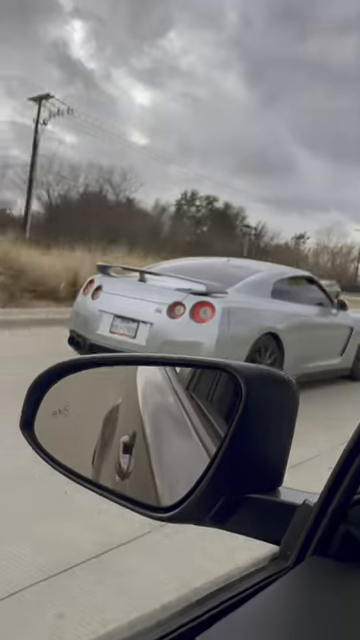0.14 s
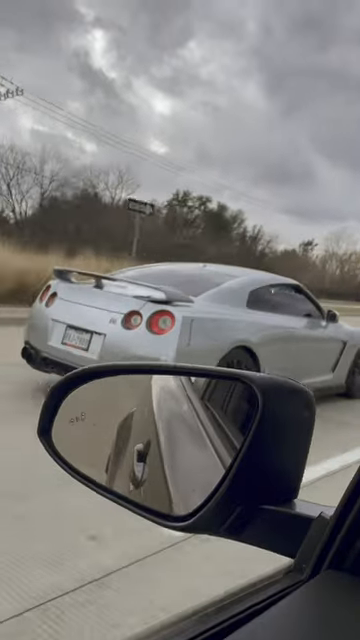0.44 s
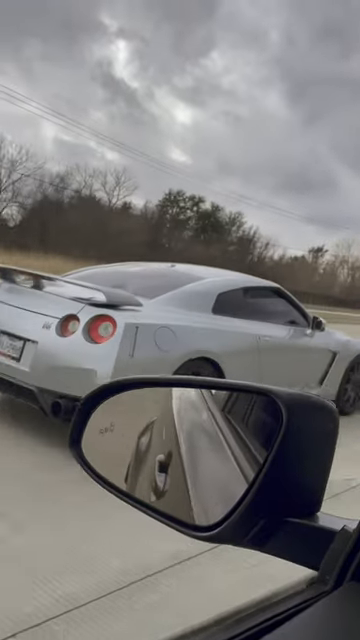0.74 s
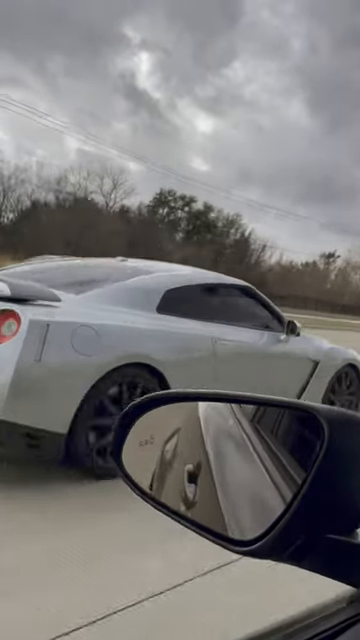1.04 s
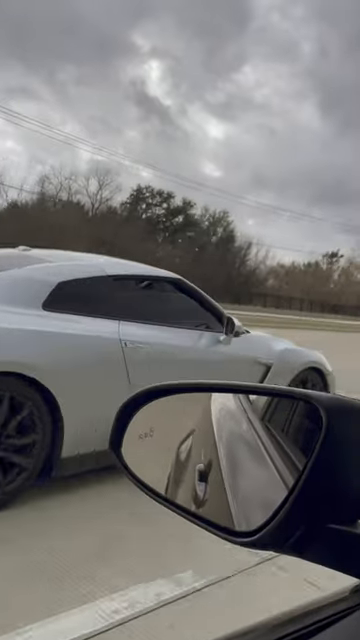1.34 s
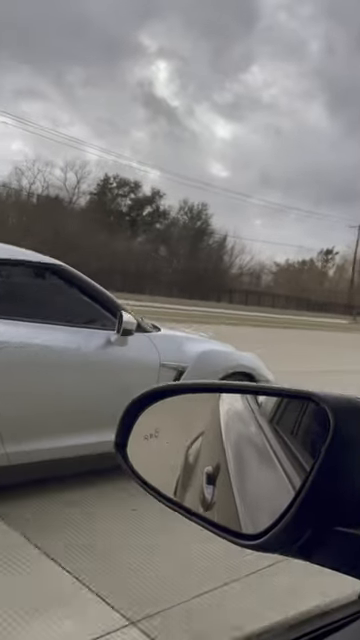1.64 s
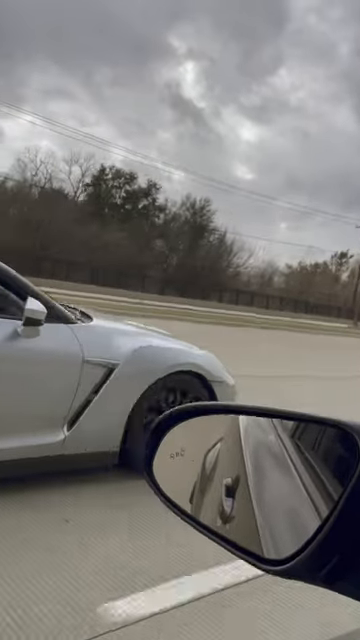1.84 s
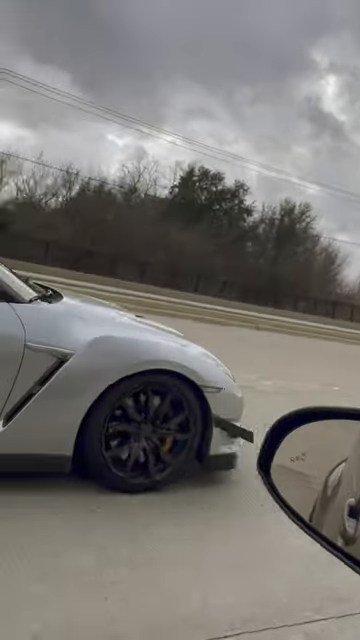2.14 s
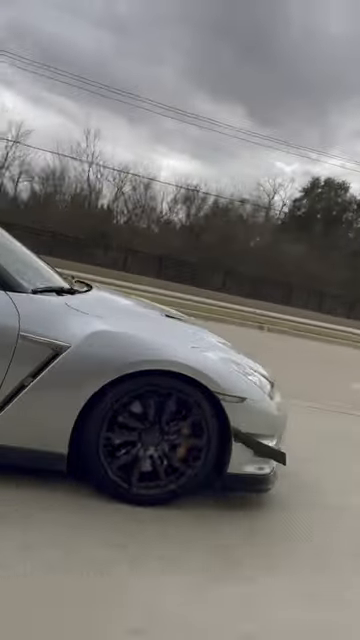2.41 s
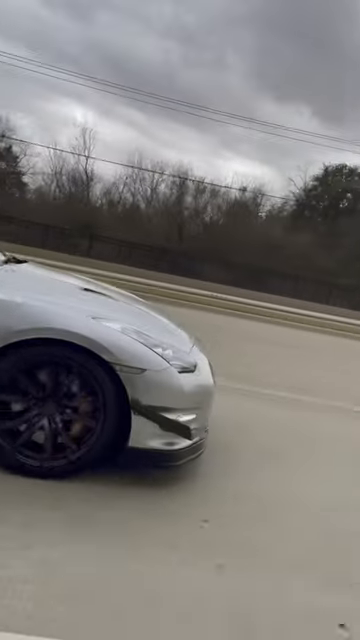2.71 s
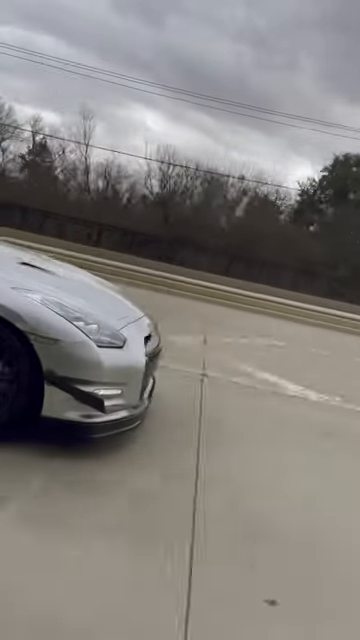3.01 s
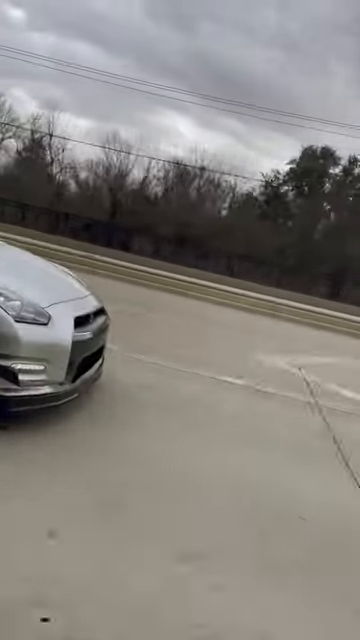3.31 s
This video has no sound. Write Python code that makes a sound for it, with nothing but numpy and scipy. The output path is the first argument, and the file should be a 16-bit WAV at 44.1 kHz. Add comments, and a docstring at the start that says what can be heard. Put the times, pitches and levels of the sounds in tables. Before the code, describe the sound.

Sports car engine heard from a passing car: a buzzing exhaust rasp fades after about a second, leaving a low drone that dips and then climbs, amid road rumble, wind gusts and microphone pops.

```python
"""Overtaking a sports car

A six-cylinder sports car is overtaken on a highway, heard from the open window of the next car.
From behind its exhaust rasps (firing pulses through filters) and throbs (uneven cylinders) as it slows;
alongside, the drone (summed sines) is left and picks up again. Tyre roar and air hiss are coloured noise;
wind is low noise on the microphone, with buffets and a few hard pops."""
import sys
import numpy as np
from scipy import signal
from scipy.fft import rfft, irfft, next_fast_len
from scipy.io import wavfile
from scipy.ndimage import uniform_filter1d

SR = 44100
rng = np.random.default_rng(int(sys.argv[2]) if len(sys.argv) > 2 else 0)


def to_wav(sig):
    """Store sig (one row per channel, or 1-D mono) as 16-bit WAV at the path in sys.argv[1].

    Samples outside -1..1 are clipped; the rate is SR.
    """
    pcm = np.clip(np.atleast_2d(sig), -1, 1) * 32767
    pcm = np.round(pcm).astype(np.int16)
    wavfile.write(sys.argv[1], SR, pcm.T)  # frames by channels


N = 152586
TIME = np.arange(N) / SR

# the six firings of one engine cycle: strength/dB, lead/firing gaps
CYLINDERS = [(2, 0.016), (0.5, .014), (-1.5, 0.028), (0.5, 0.061), (-6.5, 0.052), (-18, 0.015)]
# listening position and weak multiples: t/s, position (0 behind, 1 alongside), weak-multiple trim/dB
VIEW = [(0, 0.0, -1), (.9, 0.077, 1.5), (1.5, 0.48, -1.5), (1.85, 0.64, -2), (2.4, 1, -0.5),
        (3.46, 0.41, -4)]
# exhaust rasp body: t/s, level/dB
RASP_LEVEL = [(0, -38.5), (.131, -34.5), (.86, -36.5), (.99, -43.5), (1.2, -44), (1.62, -62), (1.87, -47),
              (2.2, -51)]

MINOR_FLUTTER_DB, FLUTTER_HZ = 1.5, 13
RASP_PAN_DB, LEFT_LEAD_S = -2, 27e-6  # pan: left minus right


def from_db(db):
    """Decibels to amplitude gain."""
    return 10 ** (np.asarray(db) / 20)


def rms_one(x):
    """Scale to unit rms."""
    return x / np.sqrt(np.mean(x ** 2) + 1e-20)


def in_time(rows):
    """Interpolate each column of a time curve at every sample."""
    t_s, *columns = np.transpose(rows)
    return [np.interp(TIME, t_s, column) for column in columns]


def colour(x, points):
    """Filter by an f/Hz, level/dB curve, zero phase, interpolated over log frequency."""
    f_hz, level_db = np.transpose(points)
    size = next_fast_len(N + SR // 10)
    bins_hz = np.arange(size // 2 + 1) * SR / size
    gain = from_db(np.interp(np.log(bins_hz + 1), np.log(f_hz), level_db))
    return irfft(rfft(x, size) * gain, size)[..., :N]


def drift(rate_hz):
    """Smooth random curve of unit rms: noise through a two-pole low-pass."""
    step = 40  # samples between drawn values
    pole = np.exp(-2 * np.pi * rate_hz * step / SR)
    noise = rng.standard_normal(N // step + 2002)
    slow = signal.lfilter([1], [1, -2 * pole, pole * pole], noise)[2000:]  # drop the settling
    return np.interp(np.arange(N) / step, np.arange(len(slow)), rms_one(slow))


def stereo_noise(points):
    """Coloured noise, alike in both ears in the bass and wide in the treble."""
    # stereo width: f/Hz, side minus mid/dB
    side_curve = [(60, -27.5), (250, -13), (600, -6), (1200, -10.5), (2500, -6.5), (5000, -3.5),
                  (10000, -1)]
    mid, side = colour(rng.standard_normal((2, N)), points)
    return rms_one(mid + colour(side, side_curve) * np.array([[1], [-1]]))


def steadied(x, window_s):
    """Even out the chance swings of a stereo noise: divide by its running rms."""
    power = uniform_filter1d(np.mean(x ** 2, axis=0), int(window_s * SR))
    return x / np.sqrt(power + 1e-9)


def placed(x, pan_db):
    """Pan by level (left minus right) and delay the right ear."""
    left = x * from_db(pan_db / 2)
    right = np.interp(TIME - LEFT_LEAD_S, TIME, x) * from_db(-pan_db / 2)
    return np.array([left, right])


def resonance(x, centre_hz, width_hz):
    """Moving band-pass: shift the centre to 0 Hz, low-pass, shift back."""
    turn = np.exp(2j * np.pi * np.cumsum(centre_hz) / SR)
    low_pass = signal.butter(2, width_hz / 2, fs=SR, output="sos")
    return np.real(signal.sosfilt(low_pass, x / turn) * turn)


def road():
    """Tyre roar: broadband noise, strongest in the bass."""
    # t/s, level/dB
    roar_level = [(0, -30.5), (1.55, -38), (2.7, -34), (3.46, -31)]
    # f/Hz, level/dB
    roar_colour = [(60, 7), (160, 1.5), (500, 3), (1000, -3), (1600, -12), (3200, -20.5), (4300, -27.5),
                   (5500, -26), (6600, -31.5), (7500, -60.5)]
    return from_db(in_time(roar_level)[0]) * stereo_noise(roar_colour)


def air():
    """Air rushing past the window: turbulent hiss."""
    # t/s, level/dB
    hiss_level = [(1.4, -64.5), (2.3, -59), (3.46, -53)]
    # f/Hz, level/dB
    hiss_colour = [(1800, -22), (3200, 9), (5800, 4), (7800, -25), (9000, 3), (12500, -2), (14000, -13.5)]
    return from_db(in_time(hiss_level)[0]) * stereo_noise(hiss_colour)


def buffet(age_s, decay_s):
    """Envelope of one gust: a quick rise and a slower fall."""
    attack_s = 0.0015
    return (1 - np.exp(-age_s / attack_s)) * np.exp(-age_s / decay_s)


def wind():
    """Wind pressure on the microphone: low rumble, with short buffets that reach higher."""
    # t/s, level/dB
    rumble_level = [(0, -28), (.3, -34), (.93, -32), (1.01, -22.5), (1.34, -25.5), (1.58, -31), (1.8, -18),
                    (1.93, -28), (2.0, -20.5), (2.1, -43), (2.34, -25), (2.85, -36), (2.91, -19),
                    (3.2, -20.5), (3.27, -23), (3.46, -19)]
    # f/Hz, level/dB
    rumble_colour = [(20, -31.5), (32, -5), (52, 10), (80, 5.5), (120, -7.5), (200, -13.5), (400, -10.5),
                     (1000, -77.5)]
    # hard buffets: start t/s, decay/s, level before envelope/dB
    gusts = [(1.002, 0.012, -18.5), (1.163, 0.024, -14), (1.589, 0.03, -21), (1.69, 0.19, -21),
             (1.805, 0.047, -17), (2.902, 0.028, -13.5), (3.171, 0.017, -10), (3.417, 0.029, -13)]
    # f/Hz, level/dB
    gust_colour = [(40, -23), (110, 11), (260, 4.5), (450, 0.5), (700, -8), (1200, -18.5), (2500, -37.5),
                   (5000, -66.5)]
    rumble = from_db(in_time(rumble_level)[0]) * steadied(stereo_noise(rumble_colour), window_s=0.13)
    swell = sum(from_db(db) * buffet(np.maximum(TIME - t_s, 0), decay_s) for t_s, decay_s, db in gusts)
    return rumble + swell * steadied(stereo_noise(gust_colour), window_s=0.022)


def pops():
    """Each pop is a short noise crack on one heavily damped swing of pressure."""
    # t/s, thump level before damping/dB, crack peak/dB, crack upper edge f/Hz
    pop_rows = [(1.165, -14, -22, 3900), (1.756, -7, -28, 1800), (1.806, -8, -17, 2000),
                (1.828, -6, -18, 2000), (2.904, -2, -11, 3000), (3.142, -16, -20, 2400),
                (3.147, -10, -21, 2000), (3.187, -4, -22, 1700), (3.418, -7, -16, 1800)]
    thump_hz, thump_decay_s = 190, 0.003
    crack_low_hz, crack_decay_s = 450, 0.0016
    out = np.zeros(N)
    for t_s, thump_db, crack_db, top_hz in pop_rows:
        age_s = np.maximum(TIME - t_s, 0)
        thump = np.sin(2 * np.pi * thump_hz * age_s) * np.exp(-age_s / thump_decay_s)
        burst = rng.standard_normal(N) * (age_s > 0) * np.exp(-age_s / crack_decay_s)
        band = signal.butter(2, [crack_low_hz, max(top_hz, 2 * crack_low_hz)], "band", fs=SR, output="sos")
        crack = signal.sosfilt(np.vstack([band, band]), burst + 1e-18)  # offset avoids denormals
        out += from_db(thump_db) * thump + from_db(crack_db) * crack / np.abs(crack).max()
    return out


def drone(cycles):
    """Multiples of the cycle rate; uneven cylinders add neighbours to the firing tones: a throb."""
    # strongest multiples of the cycle rate: order
    main_orders = (6, 9, 12, 13, 18)
    # their levels: t/s, then level/dB of each main order
    main_levels = [(0, -34, -61, -19.5, -35.5, -25), (0.149, -38.5, -49.5, -19, -34, -22.5),
                   (.5, -44, -42, -17.5, -28.5, -24), (0.851, -37, -43, -19.5, -26.5, -21),
                   (1.05, -41, -43, -25, -26.5, -27.5), (1.2, -32, -44, -21.5, -31, -26),
                   (1.42, -37, -36.5, -34.5, -26.5, -54), (1.85, -25.5, -31.5, -14.5, -48, -29.5),
                   (2.02, -25.5, -32, -19.5, -37, -31), (2.2, -25.5, -30.5, -20.5, -30, -40),
                   (2.48, -42.5, -30.5, -23, -24, -44), (2.82, -29, -24.5, -24, -28.5, -41),
                   (3.16, -38.5, -22.5, -29.5, -41, -35.5), (3.46, -37, -30.5, -25.5, -62, -26.5)]
    # weaker multiples: order, level behind/dB, level alongside/dB
    minor_orders = [(11, -39.5, -36), (14, -37, -42.5), (15, -44.5, -33.5), (17, -60, -33.5),
                    (19, -44, -34), (20, -40, -44.5), (22, -56.5, -49.5), (23, -54, -49), (24, -28.5, -68),
                    (25, -55.5, -40.5), (26, -45, -55.5), (30, -34, -53), (31, -44.5, -50),
                    (29, -60.5, -57)]
    # t/s, left minus right/dB
    engine_pan = [(0, -1.5), (.7, -1.8), (1.8, .7), (3.46, -.4)]
    main_flutter_db = 1
    count = len(CYLINDERS)
    strength = from_db(np.array(CYLINDERS)[:, 0])
    pipe_phase = rng.uniform(0, 2 * np.pi, size=12)
    alongside, trim_db = in_time(VIEW)

    def tone(order, rms_db):
        """One multiple, its phase set by the sum over the cylinders and by the pipe."""
        firing_turns = np.exp(-2j * np.pi * order * np.arange(count) / count)
        phase = np.angle(np.sum(strength * firing_turns)) + pipe_phase[round(order / count)]
        return np.sqrt(2) * from_db(rms_db) * np.cos(2 * np.pi * order * cycles + phase)

    out = np.zeros(N)
    for order, level_db in zip(main_orders, in_time(main_levels)):
        out += tone(order, level_db + main_flutter_db * drift(FLUTTER_HZ))
    for order, behind_db, beside_db in minor_orders:
        level_db = behind_db + alongside * (beside_db - behind_db) + trim_db
        out += tone(round(order), level_db + MINOR_FLUTTER_DB * drift(FLUTTER_HZ))
    return placed(out, in_time(engine_pan)[0])


def exhaust_tones(cycles):
    """Clean upper multiples glide with the engine and fade with the rasp."""
    # order, level against the rasp body/dB
    rasp_tones = [(42, -7), (48, -16.5), (55, -17), (61, -8), (67, -9.5)]
    body_db = in_time(RASP_LEVEL)[0]
    tones = np.zeros(N)
    for order, relative_db in rasp_tones:
        level = from_db(body_db + relative_db + MINOR_FLUTTER_DB * drift(FLUTTER_HZ))
        tones += np.sqrt(2) * level * np.cos(2 * np.pi * (round(order) * cycles + rng.random()))
    behind = np.clip(1 - in_time(VIEW)[0], 0, 1)
    return placed(tones * behind, RASP_PAN_DB)


def rasp(cycles):
    """Each firing sends a sharp front and a puff of gas out of the resonant tailpipe."""
    # f/Hz, level/dB
    body_colour = [(700, -6.5), (1000, 6.5), (1200, -3), (1600, 7), (2000, 3.5), (2450, -10), (3500, -53)]
    # tailpipe resonances, sinking: centre f at t=0/Hz, width/Hz, sag/(Hz/s)
    pipe_modes = [(2250, 820, 350), (3550, 900, 240), (3545, 36, 71), (5520, 670, 1800)]
    # t/s, then level/dB of each resonance
    mode_levels = [(0.041, -40.5, -54, -62, -64), (.125, -36, -42.5, -69.5, -48),
                   (.23, -43, -55.5, -72, -61.5), (.33, -36.5, -43, -69, -47.5),
                   (.44, -50, -47.5, -59, -57), (0.719, -50.5, -42.5, -47.5, -50.5),
                   (0.879, -50, -46.5, -48, -56), (1.039, -63.5, -70.5, -81.5, -78.5)]
    jitter_s, scatter_db = 12e-6, 0.9
    puff_decay_s, body_puff, treble_puff = 0.0026, 0.2, 0.6  # puffs: gain against the fronts
    pipe_delay_s, echo_gain, width_gain = 0.002167, 0.38, 0.17

    count = len(CYLINDERS)
    firing = np.arange(1, int(cycles[-1] * count))
    strength_db, lead = np.array(CYLINDERS)[firing % count].T
    chance = rng.standard_normal((2, N))[:, :len(firing)]
    t_s = np.interp((firing - lead) / count, cycles, TIME) + pipe_delay_s + jitter_s * chance[0]
    at = np.clip(np.round(t_s * SR).astype(int), 0, N - 1)
    fronts = np.zeros(N)
    fronts[at] = from_db(strength_db + scatter_db * chance[1])
    fronts = fronts + echo_gain * np.interp(TIME - pipe_delay_s, TIME, fronts)
    gate = signal.lfilter([1], [1, -np.exp(-1 / (puff_decay_s * SR))], fronts)

    def blast(puff_gain):
        """Fronts plus gated gas noise, with some noise opposed between the ears."""
        gas, side = rms_one(gate * rng.standard_normal((2, N)))
        centre = placed(rms_one(fronts) + puff_gain * gas, RASP_PAN_DB)
        return centre + width_gain * side * np.array([[1], [-1]])

    out = from_db(in_time(RASP_LEVEL)[0]) * rms_one(colour(blast(body_puff), body_colour))
    treble = blast(treble_puff)
    for (f_hz, width_hz, sag_hz_per_s), level_db in zip(pipe_modes, in_time(mode_levels)):
        ring = resonance(treble, f_hz - sag_hz_per_s * TIME, width_hz)
        out = out + from_db(level_db) * steadied(ring, window_s=0.24)
    return out


def scene():
    """One engine speed curve drives drone, tones and rasp; road, air and wind surround them."""
    # engine speed: t/s, firing rate/Hz
    firing_rate = [(0.0, 195.5), (0.11, 190.1), (0.22, 190.9), (0.56, 185.6), (0.86, 182.1), (0.98, 178.4),
                   (1.18, 177.3), (1.32, 174.2), (1.66, 168.5), (1.97, 172.1), (2.08, 165.5), (2.19, 171.2),
                   (2.31, 169.3), (2.53, 171.4), (2.84, 175.4), (3.12, 180.5), (3.46, 186.7)]
    cycles = np.cumsum(in_time(firing_rate)[0]) / SR / len(CYLINDERS)
    background = road() + air() + wind() + pops()
    return background + drone(cycles) + exhaust_tones(cycles) + rasp(cycles)


def record(dry):
    """A soft start; a steep low-pass cuts the top of the treble."""
    fade_in_s, stop_hz = 0.004, 15800
    low_pass = signal.cheby2(12, 70, stop_hz, fs=SR, output="sos")  # 70 dB down from stop_hz up
    return signal.sosfilt(low_pass, dry * np.minimum(TIME / fade_in_s, 1))


dry = scene()
out = record(dry)
to_wav(out)
```